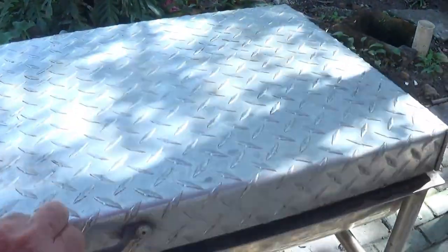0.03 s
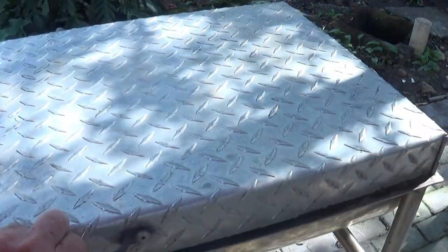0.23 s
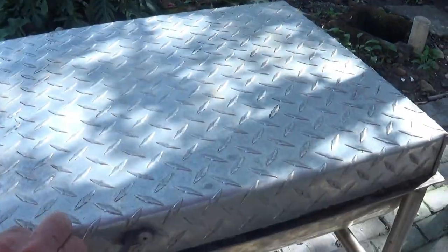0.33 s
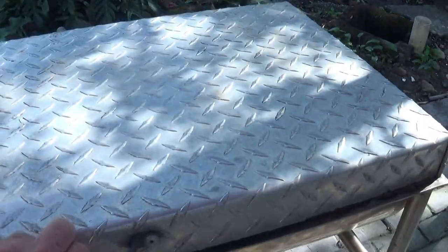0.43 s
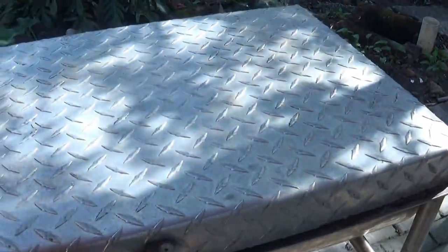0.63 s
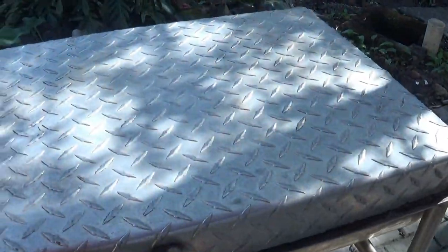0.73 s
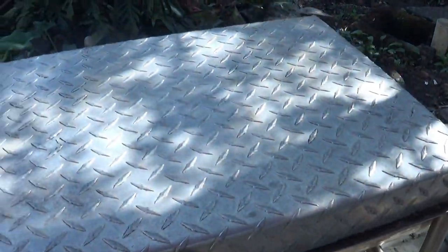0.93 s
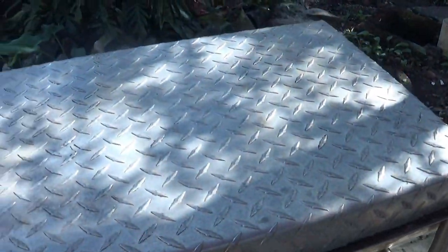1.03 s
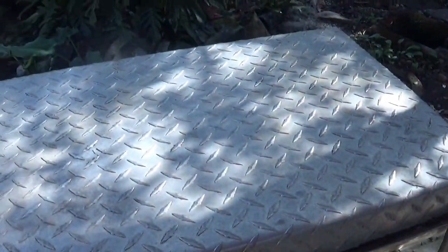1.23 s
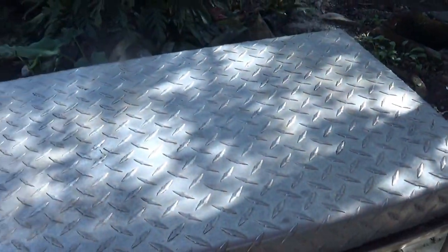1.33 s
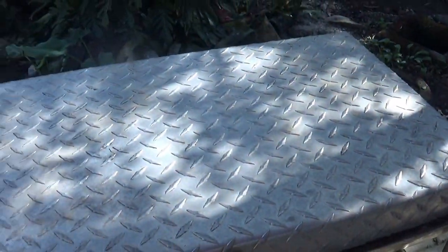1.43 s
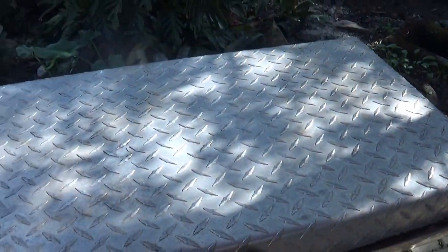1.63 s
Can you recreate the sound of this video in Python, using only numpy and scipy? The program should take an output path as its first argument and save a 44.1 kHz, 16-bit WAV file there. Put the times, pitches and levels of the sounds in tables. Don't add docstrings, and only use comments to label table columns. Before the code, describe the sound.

Close outdoor recording of a metal lid slamming almost at once, several blows blurring into one harsh clang with a short hollow ring, followed by a latch click, light finger scuffs, faint bird whistles and tiny late ticks.

```python
import sys
import numpy as np
from scipy import signal
from scipy.io import wavfile
from scipy.ndimage import uniform_filter1d

SR = 44100
rng = np.random.default_rng(int(sys.argv[2]) if len(sys.argv) > 2 else 0)


def invert_db(level):
    return 10 ** (np.asarray(level, dtype=float) / 20)


def wrap_up_sound(samples):
    columns = np.atleast_2d(samples).T
    tamed = np.clip(columns, -1, 1)
    steps = np.round(tamed * 32767).astype(np.int16)
    wavfile.write(sys.argv[1], SR, steps)


N = 74970

# [t/s, blow level/dB, metal-on-metal chatter level/dB]
CONTACTS = [(0.1628, -1, -19), (0.167, -7.5, -13.5), (0.175, -8.5, -32), (0.186, -20, 0),
            (0.188, -9.5, -3.5), (0.1929, -8.5, -2), (0.196, -0.5, -7.5), (0.202, -4, -16), (0.21, -7, -26),
            (0.217, -7, -8), (0.222, 0, -13.5), (0.23, -9.5, -20), (.238, -8, -20.5), (0.245, -13, -25),
            (0.256, -11, -12.5), (0.26, -19.5, -15), (0.2663, -6, -14), (0.269, -20, -18.5),
            (0.277, -5.5, -15), (0.297, -13, -30.5), (0.31, -14, -45)]
BLOW_FADE_S, BLOW_RISE_S, CHATTER_FADE_S = 0.0039, 0.0013, 0.0027
CLICKS_PER_S, GRIT_DB = 7000, 2.5

# [level/dB, t60/s]
FRAME_HZ = [188, 233, 254, 297, 394, 436, 479, 524, 592, 764, 816, 840, 875, 915]
FRAME = [(-53.5, 1.36), (-51.5, 1.17), (-51, 1.18), (-41.5, .3), (-50, 0.6), (-53, 1.08), (-49.5, 0.72),
         (-55, 1.1), (-53.5, 1.28), (-56.5, 2.2), (-40.5, 0.32), (-46, 0.93), (-43, 0.75), (-53.5, 0.81)]
# [level/dB, t60/s]
GRATE_HZ = [957, 1126, 1317, 1427, 1558, 1735, 1841, 2250, 2541, 3023, 3493, 3900, 4155, 5118]
GRATE = [(-49, 0.82), (-45, 0.29), (-55.5, 1), (-44.5, 0.86), (-52.5, 1.3), (-54, 1.39), (-52, 1.6),
         (-56.5, 0.86), (-51, 0.39), (-49.5, 0.43), (-59, 0.37), (-61.5, 0.6), (-56, 0.45), (-57, 0.22)]
# [level/dB, t60/s]
LID_HZ = [257, 317, 456, 549, 621, 745, 835, 1082, 1187, 1900, 1939, 2079, 2127, 2287]
LID = [(-36.5, 0.17), (-35, .2), (-40.5, 0.3), (-40.5, 0.54), (-41.5, 0.28), (-41, 0.46), (-34.5, 0.12),
       (-44.5, 0.48), (-44.5, 0.18), (-54, 0.1), (-38, 0.089), (-40, 0.11), (-40, 0.17), (-47, 0.34)]
# [level/dB, t60/s]
LID_MORE_HZ = [1340, 2394, 2509, 2635, 2771, 3067, 3441, 4430, 4652, 6536, 6625, 7315, 7508, 9260]
LID_MORE = [(-42.5, 0.065), (-46, 0.44), (-42, 0.15), (-36.5, 0.17), (-41, 0.15), (-41, 0.18), (-50, .15),
            (-68, 0.13), (-41.5, 0.25), (-41, 0.13), (-51, 0.073), (-42, 0.097), (-36, 0.094), (-37, 0.015)]
# [f/Hz, level/dB, t60/s]
RIM = [(7400, -13.5, 0.012), (9470, -2, 0.0092), (9280, -6.5, 0.019), (10370, -8, 0.0071),
       (11700, -8.5, 0.011)]
# [f/Hz, level/dB]
PLATE = [(65, -52), (150, -10.5), (260, -8.5), (700, -12.5), (1500, -13.5), (2080, -6.5), (5330, -14),
         (9440, -11.5), (14500, -24)]
# [f/Hz, t60/s]
PLATE_T60 = [(120, 0.2), (400, 0.32), (1000, 0.43), (1900, 0.22), (2500, 0.15), (5000, 0.14), (9000, 0.063),
             (14000, 0.035)]
# [f/Hz, level/dB, t60/s]
HOLLOW = [(40, -55, 0.2), (88, -70, 1.0), (128, -58, .7)]
FRAME_DB, LID_DB, RIM_DB, PLATE_DB, CRACK_DB = 0.83, 2.14, -28, -25.5, -28
LINGER, LINGER_DB = 3.6, -17
CLANG_S, SETTLED_S = (.17, .3), (.29, .36)
FRAME_SWELL_S = 0.08
WOBBLE_PER_S, LID_WOBBLE_DB, FRAME_WOBBLE_DB, GRATE_WOBBLE_DB = 13, 1, 4.2, 1.2
METAL_LOW_HZ, METAL_TOP_HZ, LID_SIDE_DB = 173, 11700, -11.5

LATCH_S = [
    .613,
    .6145,
    .6194,
    .6243,
    1.5711,
    1.5733,
    1.578,
    1.612,
]
LATCH_DB = [-20.5, -35, -30.5, -47, -48, -39.5, -56.5, -44]
# [f/Hz, level/dB, t60/s]
LATCH = [(6890, 0.5, 0.0035), (4930, -4, 0.0032), (3600, -5, 0.00077), (12800, -15, 0.00098)]
BOUNCE_DULL_DB = -9
# [f/Hz, level/dB, t60/s]
KNOCK = [(590, -52, 0.024), (1080, -46, 0.0097), (1840, -50, 0.0066)]
KNOCK_S = 1.6655

# [t/s, level/dB, fade/s, extra dull level/dB]
BRUSHES = [(0.043, -47, 0.015, -3), (.452, -57.5, 0.016, -40), (.545, -60.5, 0.12, -26),
           (0.581, -55.5, 0.048, -12), (0.648, -59, 0.029, -10), (0.705, -52.5, 0.0066, -8),
           (0.783, -56, 0.0059, -20), (1.05, -64, 0.036, -18), (1.195, -53, 0.0066, -25),
           (1.2356, -57, 0.0048, -10), (1.548, -59.5, 0.014, -3), (1.5704, -51, 0.0062, -3.5),
           (1.6, -62.5, 0.035, 0)]
# [f/Hz, level/dB per Hz]
BRUSH = [(900, -38), (1600, -13), (3300, -1.5), (5000, -17), (9000, 5.5), (11500, -37), (15500, -43)]
# [t/s, level/dB]
SIZZLE = [(0.0, -62.5), (0.198, -68.5), (0.354, -66.5), (.53, -67.5), (.585, -58), (.64, -67.5),
          (0.738, -64.5), (1.178, -71.5), (1.7, -71.5)]
SIZZLE_HZ, SIZZLE_WIDTH_HZ, DULL_HZ = 9850, 2300, 5250

ECHO_T60_S, ECHO_DB = 0.58, -27.5
# [t/s, length/s, level/dB, start f/Hz, end f/Hz]
BIRD = [
    (.02, 0.029, -55, 5120, 4750),
    (.383, 0.042, -58, 5150, 4860),
    (.535, 0.066, -63, 4900, 5260),
    (1.095, 0.041, -66, 2440, 2320),
    (1.205, 0.095, -65, 2790, 2423),
    (1.22, 0.073, -66, 2410, 2370),
    (1.29, 0.126, -68, 2270, 2115),
    (1.405, .04, -68, 2610, 2690),
    (1.44, .085, -64.5, 2940, 2820),
    (1.45, 0.12, -71, 2150, 2160),
]
BIRD_WAVER_HZ = 90
# [f/Hz, level/dB per Hz]
GARDEN = [(18, -57), (30, -27.5), (239, -5), (449, -3.5), (569, -2), (2350, -10), (3770, -14.5),
          (10200, -16.5), (16000, -25.5)]
# [t/s, level/dB]
GARDEN_DB = [(0, -55), (.15, -57.5), (.8, -58), (1.7, -59.5)]
# [f/Hz, likeness 0..1]
LIKENESS = [(60, 0.98), (300, 0.99), (1000, 0.57), (3000, 0.5), (8000, 0.87), (14000, 0.99)]
RUMBLE_DB = -90.5

# [from t/s, to t/s, top f/Hz]
TREBLE_TOP = [
    (-.1, .164, 15850),
    (.166, .175, 12000),
    (.175, .181, 10600),
    (.188, .218, 14500),
    (.218, .254, 13300),
    (.254, .608, 15850),
    (.618, 1.8, 15850),
]
LIMIT_DB, RELEASE_DB_PER_S = -8.5, 301
DUCK_S, DUCK_WIDTH_S, DUCK_DB = .1838, .0025, -9


def rms_one(x):
    return x / np.sqrt(np.mean(x ** 2) + 1e-20)


def at_hz(points, hz):
    table_hz, values = np.transpose(points)
    return np.interp(np.log(hz), np.log(table_hz), values)


def in_time(rows):
    return np.interp(np.arange(N) / SR, *np.transpose(rows))


def band(x, low_hz, high_hz, order=2):
    return signal.sosfilt(signal.butter(order, [low_hz, high_hz], "band", fs=SR, output="sos"), x)


def drift(rate):
    r = np.exp(-80 * np.pi * rate / SR)
    slow = signal.lfilter([1], [1, -2 * r, r * r], rng.standard_normal(N // 40 + 2002))[2000:]
    return np.interp(np.arange(N) / 40, np.arange(len(slow)), rms_one(slow))


def ring(clicks, hz, t60):
    r = invert_db(-60 / (max(t60, 1e-3) * SR))
    w = 2 * np.pi * hz / SR
    return signal.lfilter([0, np.sin(w)], [1, -2 * r * np.cos(w), r * r], clicks + 1e-18)


def bursts(times, levels_db, fades):
    t = np.arange(N) / SR - np.asarray(times)[:, None]
    fade = np.exp(-np.abs(t) / np.reshape(fades, (-1, 1)))
    return (invert_db(levels_db)[:, None] * (t >= 0) * fade).sum(0)


def banded_noise(spectrum, patchy_db):
    out, edges = 0, 30 * 2 ** np.arange(0, 9.6, .5)
    white = rng.standard_normal((2, 2, N))
    for k, (low, high) in enumerate(zip(edges, edges[1:])):
        mid, side = band(white[k % 2], low, min(high, .45 * SR))
        hz = np.sqrt(low * high)
        alike = np.clip(at_hz(LIKENESS, hz), 0, 1)
        stereo = np.sqrt(1 + alike) * mid + np.sqrt(1 - alike) * side * [[1], [-1]]
        out = out + invert_db(at_hz(spectrum, hz) + patchy_db * drift(25.0)) * stereo
    return rms_one(out)


def contacts():
    s, blow_db, chatter_db = np.transpose(CONTACTS)
    hold = np.exp(-1 / (BLOW_RISE_S * SR))
    blow = signal.lfilter([1 - hold], [1, -hold], bursts(s, blow_db, BLOW_FADE_S))
    chatter = bursts(s, chatter_db, CHATTER_FADE_S)
    sizes = invert_db(GRIT_DB * np.minimum(rng.exponential(1, (8, N)), 3))
    hits = rng.random((8, N)) < CLICKS_PER_S / SR
    grit = .1 * rms_one(rng.standard_normal((8, N)) * sizes * hits)
    return blow, chatter, grit


def plate_modes(count):
    even = 140 + 13500 * np.linspace(0, 1, count) ** 1.5
    spacing = np.gradient(even)
    level_luck, ring_luck, pitch_luck = rng.normal(0, 1, (3, count))
    hz = even + spacing * pitch_luck / 3
    usual_t60 = at_hz(PLATE_T60, hz)
    db = PLATE_DB + at_hz(PLATE, hz) + 10 * np.log10(spacing / 30 / usual_t60 / 10) + 1.9 * level_luck
    t60 = usual_t60 * np.exp(0.1 * ring_luck)
    db[::3] += LINGER_DB
    t60[::3] *= LINGER
    return list(zip(hz, db, t60))


def named_modes(pitches, table, level_db):
    return [(hz, db + level_db, t60) for hz, (db, t60) in zip(pitches, table)]


def lid(count=480):
    blow, chatter, grit = contacts()
    modes = plate_modes(count)
    modes += named_modes(FRAME_HZ + GRATE_HZ, FRAME + GRATE, FRAME_DB)
    modes += named_modes(LID_HZ + LID_MORE_HZ, LID + LID_MORE, LID_DB)
    modes += [(hz, db + RIM_DB, t60) for hz, db, t60 in RIM]
    frame_end, grate_end = count + len(FRAME), count + len(FRAME + GRATE)
    landing_s = CONTACTS[0][0]
    since = np.maximum(np.arange(N) / SR - landing_s, 0)
    swell = 1 - np.exp(-(since / FRAME_SWELL_S) ** 2)
    out, deal = np.zeros((2, N)), rng.integers(0, 7, len(modes))
    for n, ((hz, db, t60), k) in enumerate(zip(modes, deal)):
        span = slice(int(landing_s * SR) - 9, int((.36 + 1.2 * t60) * SR))
        bright = 1 / (1 + (4000 / hz) ** 4)
        drive = (1 - bright) * blow[span] + bright * chatter[span]
        tone = ring(grit[k:k + 2, span] * drive, hz, t60)
        if n < count:
            last = int(CLANG_S[1] * SR) - span.start
            share = signal.lfilter([.005], [1, -invert_db(-120 / (t60 * SR))], drive[:last] ** 2).mean()
            tone = tone * np.sqrt(share) / tone[:, :last].std(1, keepdims=True)
        else:
            lasting = n < grate_end
            wobble_db = FRAME_WOBBLE_DB if n < frame_end else GRATE_WOBBLE_DB if lasting else LID_WOBBLE_DB
            first, last = (int(t * SR) - span.start for t in (SETTLED_S if lasting else CLANG_S))
            tone = tone * invert_db(wobble_db * drift(WOBBLE_PER_S)[span])
            if lasting:
                tone = tone * swell[span]
            tone = tone / tone[:, first:last].std(1, keepdims=True)
        out[:, span] += invert_db(db) * tone
    out += invert_db(CRACK_DB) * band(grit[:2] * chatter, 4500, 12000) * [[1], [1.6]]
    out = band(out, METAL_LOW_HZ, METAL_TOP_HZ, order=5)
    mid, side = out[0], invert_db(LID_SIDE_DB) * out[1]
    air = sum(invert_db(db) * ring(grit[2:4] * blow, hz, t60) for hz, db, t60 in HOLLOW)
    return np.array([mid + side, mid - side]) + air[0] + .5 * air[1] * [[1], [-1]]


def latch():
    clicks = np.zeros(N)
    clicks[(np.array(LATCH_S) * SR).astype(int)] = invert_db(LATCH_DB)
    bouncing = np.arange(N) > LATCH_S[1] * SR - 2
    dulled = clicks * np.where(bouncing, invert_db(BOUNCE_DULL_DB), 1)
    out = 0
    for k, (hz, db, t60) in enumerate(LATCH):
        out = out + invert_db(db) * ring(dulled if k else clicks, hz, t60) * (-1) ** k
    return signal.lfilter(*signal.butter(3, 2900, "high", fs=SR), out)


def knock():
    click = np.arange(N) == int(KNOCK_S * SR)
    out = sum(invert_db(db) * ring(click, hz, t60) for hz, db, t60 in KNOCK)
    return signal.lfilter(*signal.butter(2, 250, "high", fs=SR), out)


def hand():
    s, db, fade, dull_db = np.transpose(BRUSHES)
    envelopes = [bursts(s, db, fade), bursts(s, db + dull_db, fade)]
    swell, dull = signal.lfilter([.04], [1, -.96], envelopes)
    half = SIZZLE_WIDTH_HZ / 2
    hiss = rms_one(band(rng.standard_normal(N), SIZZLE_HZ - half, SIZZLE_HZ + half))
    low = rms_one(band(rng.standard_normal(N), 0.57 * DULL_HZ, 1.7 * DULL_HZ))
    grit = invert_db(3.4 * np.clip(drift(330), -2, 2))
    scuffs = grit * (swell * banded_noise(BRUSH, patchy_db=-2.0) + dull * low)
    return scuffs + invert_db(in_time(SIZZLE) + 0.5 + 2.4 * drift(25)) * hiss


def yard(x):
    t = np.arange(SR) / SR
    tail = rng.standard_normal((2, SR)) * invert_db(-60 * t / ECHO_T60_S) * (t > .012)
    tail = signal.lfilter([.25], [1, -.75], tail)
    tail = tail / np.sqrt(np.sum(tail[0] ** 2))
    return invert_db(ECHO_DB) * signal.fftconvolve(x, tail, axes=1)[:, :N]


def bird():
    out, waver = np.zeros(N), BIRD_WAVER_HZ * drift(43)
    for s, length, db, start_hz, end_hz in BIRD:
        size, i = int(length * SR), int(s * SR)
        hz = np.linspace(start_hz, end_hz, size) + waver[i:i + size]
        out[i:i + size] += invert_db(db) * np.hanning(size) * np.sin(2 * np.pi * np.cumsum(hz) / SR)
    return out * invert_db(np.array([[1.5], [-1.5]]))


def garden():
    rumble = invert_db(RUMBLE_DB) * rms_one(band(rng.standard_normal((2, N)), 20, 90))
    return rumble + invert_db(in_time(GARDEN_DB)) * banded_noise(GARDEN, patchy_db=0.04)


def scene():
    metal = lid() + (latch() + knock()) * invert_db(np.array([[.5], [-.5]]))
    return metal + yard(metal) + hand() + bird() + garden()


def top_cut(x):
    return signal.sosfilt(signal.butter(12, 16300, fs=SR, output="sos"), x)


def record(dry):
    t = np.arange(N) / SR
    over = np.maximum(20 * np.log10(np.abs(dry).max(0) + 1e-9) - LIMIT_DB, 0)
    slope = RELEASE_DB_PER_S * t
    cut_db = uniform_filter1d(np.maximum.accumulate(over + slope) - slope, size=200)
    cut_db = cut_db - DUCK_DB * np.exp(-((t - DUCK_S) / DUCK_WIDTH_S) ** 2)
    mix = dry
    for start, end, top_hz in TREBLE_TOP:
        inside = np.abs(t - (start + end) / 2) < (end - start) / 2
        busy = uniform_filter1d(1. * inside, size=120)
        low = signal.sosfiltfilt(signal.cheby2(12, 50, 1.035 * top_hz, fs=SR, output="sos"), dry)
        mix = mix + busy * (low - dry)
    return top_cut(mix * invert_db(-cut_db))


dry = scene()
out = record(dry)
wrap_up_sound(out)
```